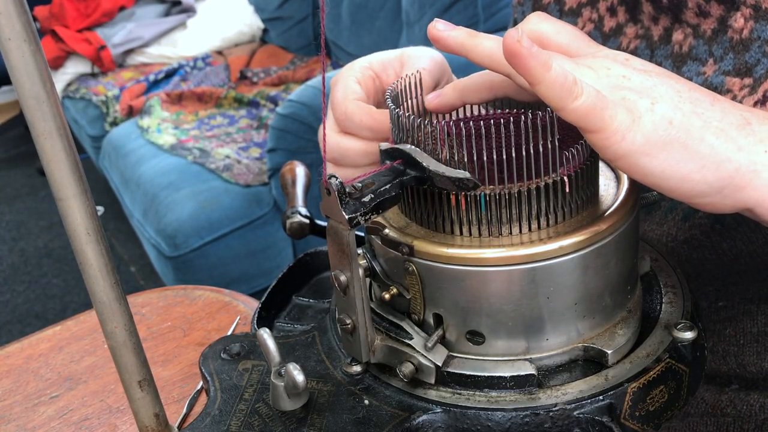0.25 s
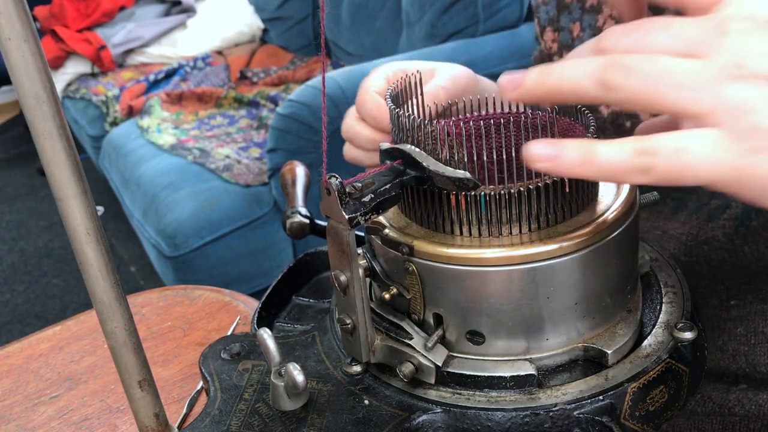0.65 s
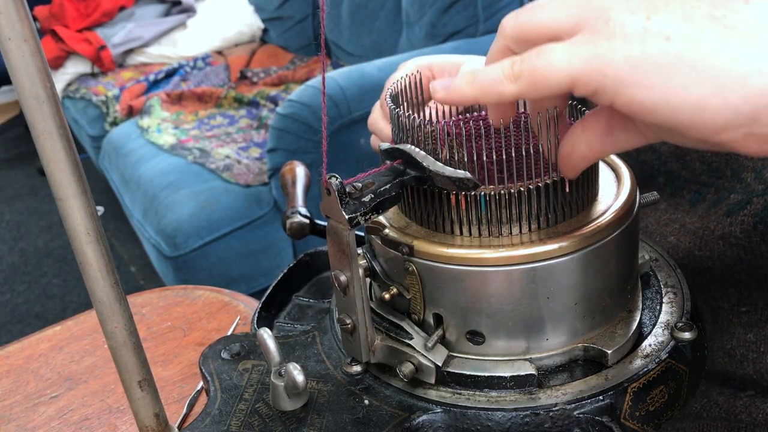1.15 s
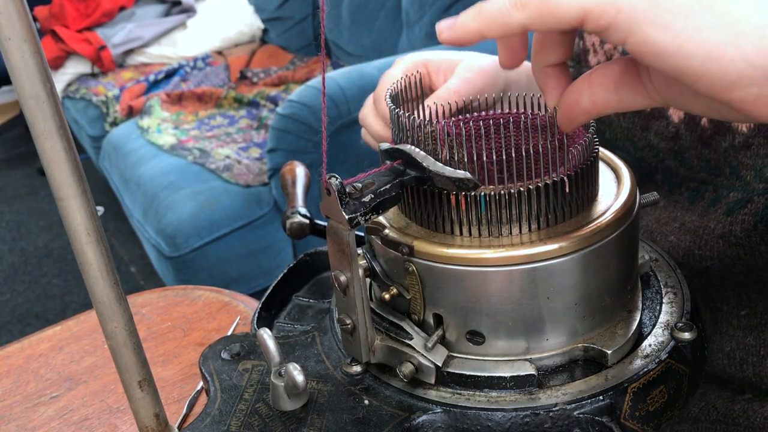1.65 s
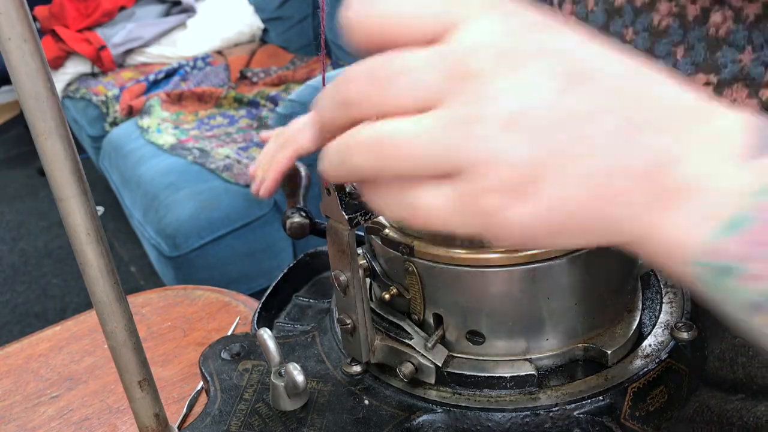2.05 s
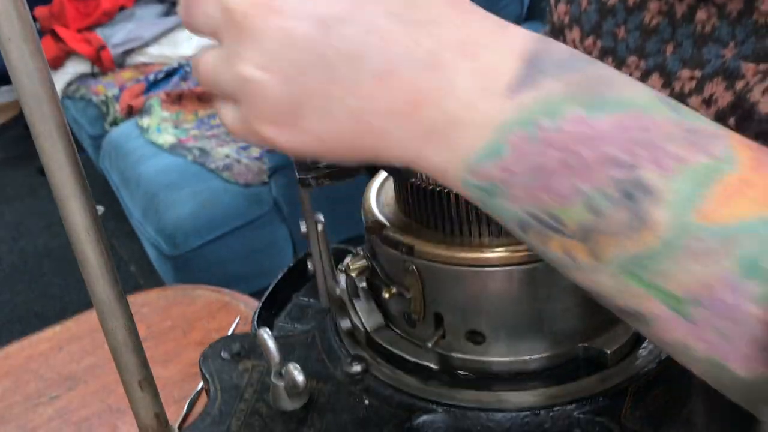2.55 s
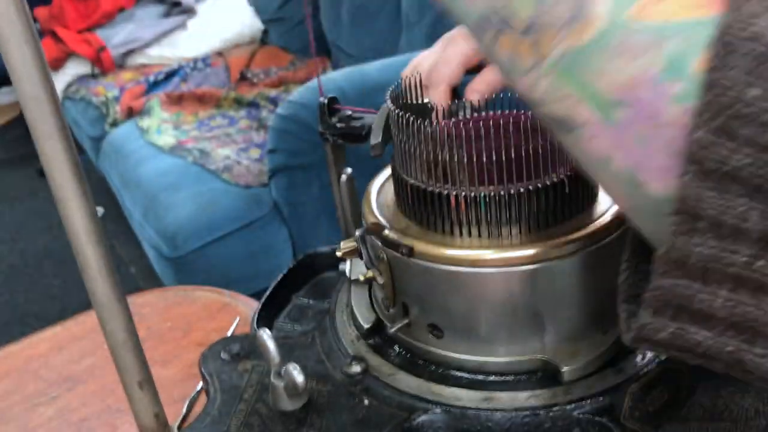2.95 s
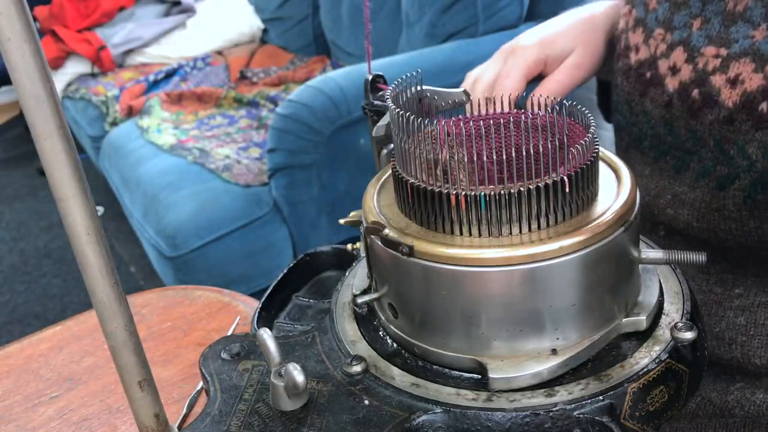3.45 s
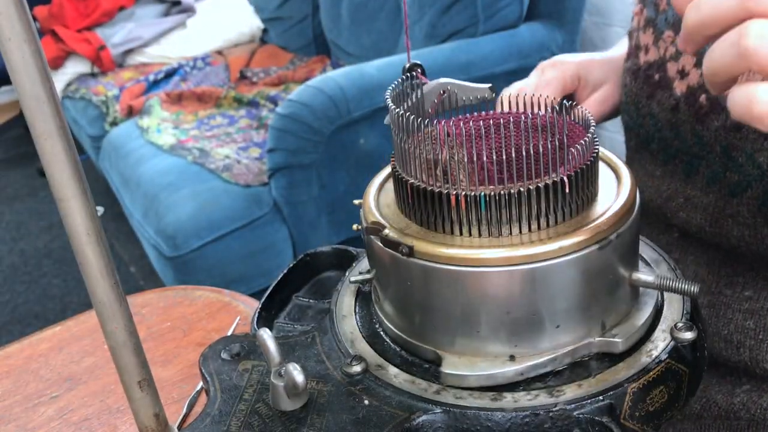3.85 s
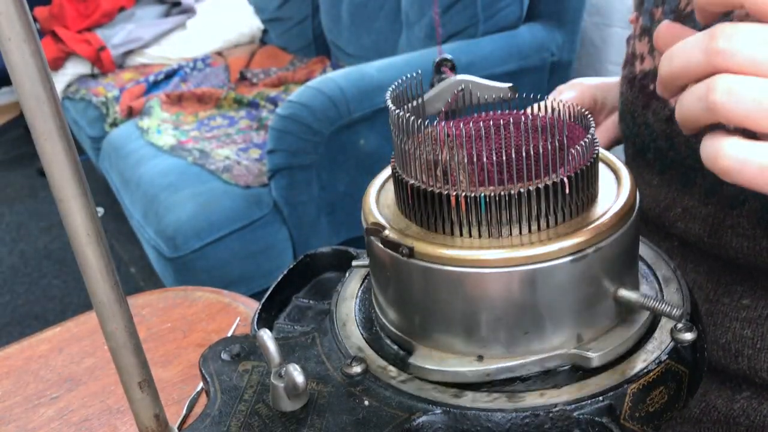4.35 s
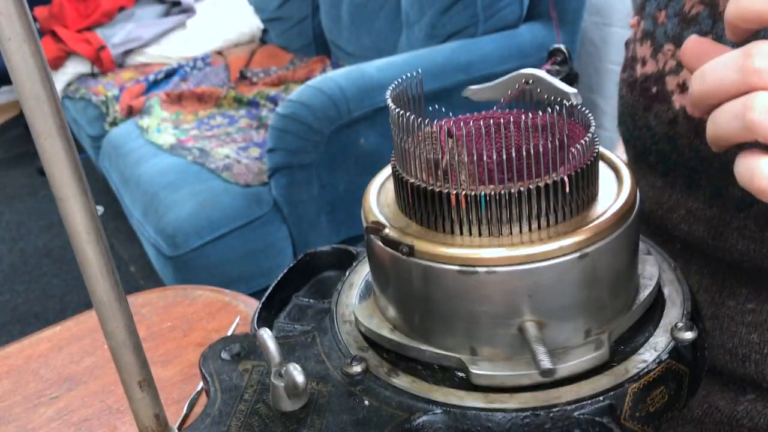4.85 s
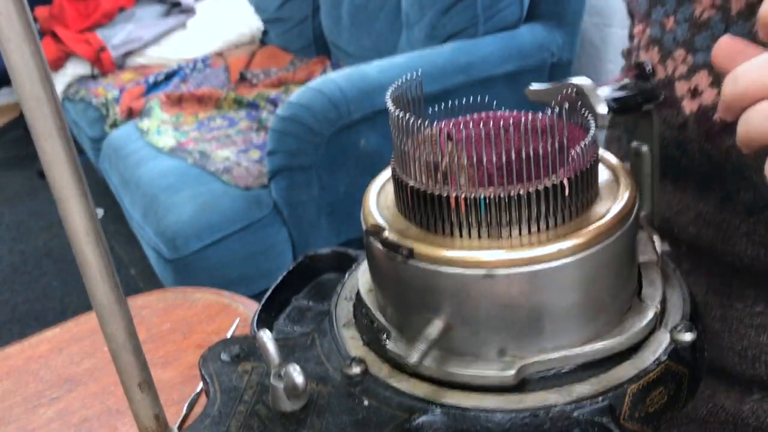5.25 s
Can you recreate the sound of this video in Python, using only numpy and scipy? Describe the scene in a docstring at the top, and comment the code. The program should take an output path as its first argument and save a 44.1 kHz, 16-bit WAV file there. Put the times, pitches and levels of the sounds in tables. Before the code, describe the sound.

A quiet, soft-furnished living room with low room tone and faint hiss, heard close through a small microphone. For the first 1.4 seconds there is almost nothing: a faint stir and tiny needle clicks near 0.8, 0.9 and 1.2. Clearer dry, crackling snaps come at about 1.5, 1.6 and 1.8. At 2.3 a dull carrier bump starts low stand rumble, rubbing and a cluster of muffled iron knocks to 2.7, with a crisp snap at 2.64. At 2.77 comes the loudest event, a hard steel-on-steel clack with a quick bounce, short shell ring and rattling shudder dying within a quarter second. Scattered knocks continue to 3.6, then settle from 3.75 into even gear knocks, roughly eleven per second. From 4.4 bright needle chatter, sliding hiss and irregular snaps rush in, growing gradually as rumble and gear grind rise, still running at the 5.5-second end.

```python
"""Quiet, soft living room: a hand-cranked circular knitting machine on a wooden stand.
Fingers lift single needles (crackling snaps); the carrier clacks against a stop (blows ringing a shell).
The crank turns: gear teeth knock evenly (struck base modes), the stand rumbles (resonant noise) and
needles chatter through the cams (random short rings, sliding hiss). Room tail and hiss surround it."""
import sys
import numpy as np
from scipy import signal
from scipy.fft import rfft, irfft
from scipy.io import wavfile

SR = 44100
rng = np.random.default_rng(int(sys.argv[2]) if len(sys.argv) > 2 else 0)


def file_out(sig):
    """Save sig as 16-bit WAV at sys.argv[1]."""
    # one column per channel
    cols = np.atleast_2d(sig).T
    # limit, then scale
    lim = np.clip(cols, -1, 1)
    pcm = np.round(lim * 32767).astype(np.int16)
    wavfile.write(sys.argv[1], SR, pcm)


N = 242946

# knocks on the iron base: gear teeth, soft nudges, bounces after the hard clack:
# (time [s], strike level [dB], brightness [dB])
BASE_KNOCKS = [(0.083, -65, 5), (0.296, -63.5, 0), (1.396, -66, 0), (1.484, -57, -13), (1.561, -51, -5),
               (1.641, -53, 8), (1.766, -66, 0), (1.807, -54, -3), (1.873, -68, -3), (2.309, -51, -8),
               (2.384, -49, 0), (2.402, -51, 3), (2.475, -47.5, 4), (2.49, -41, -2), (2.51, -42, -1),
               (2.554, -40.5, 0), (2.589, -40.5, 2.5), (2.627, -41, -9), (2.671, -44, 9), (2.843, -43, 1.5),
               (2.881, -42, 0), (2.903, -43, 2), (2.969, -40.5, 6), (3.047, -56, 7), (3.161, -43.5, -3.5),
               (3.243, -54, 4.5), (3.358, -54.5, 2.5), (3.429, -53, 7.5), (3.456, -49.5, -5),
               (3.549, -48.5, 1), (3.742, -42.5, 2), (3.838, -42, 0), (3.916, -40, 6), (4.012, -44, 6),
               (4.103, -38, 6.5), (4.193, -39, 5), (4.285, -41, 5.5), (4.377, -41, 11),
               (4.465, -40.5, 13.5), (4.558, -39, 10), (4.644, -39, -1), (4.697, -53, 0), (4.742, -39.5, 7),
               (4.826, -44.5, -9), (4.911, -40, 2), (5.005, -41, 5), (5.094, -39.5, 5), (5.116, -37, 0),
               (5.179, -37, 6), (5.278, -36, 0), (5.362, -36, 6), (5.386, -45.5, -3), (5.462, -40.5, -6)]
# carrier against the cam shell:
# (time [s], blow level [dB], contact cut-off [Hz], crack level [dB], carrier arm ring level [dB])
CARRIER_BLOWS = [(2.3170, -31, 947, -56.5, -68.5), (2.3215, -33, 1099, -65, -71),
                 (2.7162, -32, 780, -67, -79.5), (2.7202, -36.5, 780, -71, -82.5),
                 (2.7730, -24.5, 3000, -14.5, -47.5), (2.7752, -15, 2600, -28.5, -70.5),
                 (2.7890, -26, 1199, -38, -66.5)]
# needle traffic spectrum: (frequency [Hz], level per Hz [dB])
TRAFFIC_SPECTRUM = [(880, -28.5), (1500, -0.5), (3150, -9.5), (4060, -7.5), (6250, -7.5), (7670, -10.5),
                    (9140, -10.5), (10400, -9), (11800, -11), (15500, -18)]
IDLE_DB, ENGAGE_S, ENGAGE_RISE_S = -83, 4.38, 0.14   # idle needles; cams reach them, rise time


def amp(db):
    """Decibels to gain."""
    return 10 ** (np.asarray(db) / 20)


def rms_one(x):
    """Scale to unit rms."""
    return x / np.sqrt(np.mean(x ** 2) + 1e-20)


def at_hz(points, hz):
    """Read a table on a log-frequency axis."""
    table_hz, values = np.array(points).T
    return np.interp(np.log(hz), np.log(table_hz), values)


def coloured(x, spectrum):
    """Weight a signal by a spectrum table; rms 1."""
    hz = np.maximum(np.fft.rfftfreq(N, 1 / SR), 1)
    return rms_one(irfft(rfft(x) * amp(at_hz(spectrum, hz)), N))


def ring(force, hz, t60_s):
    """Two-pole mode: a unit click starts a decaying sine of height 1."""
    r, w = amp(-60 / (t60_s * SR)), 2 * np.pi * hz / SR
    return signal.lfilter([0, np.sin(w)], [1, -2 * r * np.cos(w), r * r], force + 1e-18)


def resonant_noise(peaks):
    """Steady random shaking through resonances (Hz, width Hz, dB); rms 1."""
    total = np.zeros(N)
    for hz, width_hz, db in peaks:
        total += amp(db) * rms_one(ring(rng.standard_normal(N), hz, 2.0 / width_hz))
    return rms_one(total)


def band(x, low_hz, high_hz):
    """Band-pass."""
    return signal.sosfilt(signal.butter(2, [low_hz, high_hz], "band", fs=SR, output="sos"), x)


def add(track, s, sound):
    """Mix a short sound in at a time."""
    at = round(s * SR)
    track[at:at + len(sound)] += sound[:len(track) - at]


def drift(rate_hz):
    """Slow random wander of spread 1: twice low-passed noise."""
    r = np.exp(-2 * np.pi * rate_hz / SR)
    wander = signal.lfilter([1], [1, -2 * r, r * r], rng.standard_normal(N + 4000))
    return rms_one(wander[4000:])   # settled part


def hush():
    """Room and microphone hiss: steady coloured noise."""
    # (frequency [Hz], level per Hz [dB])
    hush_spectrum = [(18, -32), (30, -1.5), (55, 0), (86, -10), (131, -3), (233, -13), (266, -20.5),
                     (384, -12), (449, -20.5), (632, -20), (866, -25), (988, -23), (1760, -29), (2750, -30),
                     (16000, -36.5)]
    return amp(-70) * coloured(rng.standard_normal(N), hush_spectrum)


def work():
    """Hands and crank: shaking of the stand and load on the gears, in dB over time."""
    # (time [s], shaking of the stand [dB], load on the gears [dB])
    effort = [(0.0, -79, -86), (0.36, -66.5, -90), (0.7, -85.5, -88), (1.3, -88, -82.5), (1.51, -61, -78),
              (1.64, -64, -81), (1.88, -75, -86), (2.12, -82.5, -93), (2.27, -63.5, -93),
              (2.36, -50.5, -57.5), (2.49, -60, -75), (2.56, -60.5, -63), (2.76, -65, -56.5),
              (2.97, -57, -71), (3.2, -70.5, -78.5), (3.72, -63, -76), (4.31, -66.5, -88),
              (4.52, -60, -64.5), (5.0, -58.5, -67), (5.3, -53.5, -63), (5.51, -52, -63)]
    s, shaking_db, load_db = np.transpose(effort)
    t = np.arange(N) / SR
    return np.interp(t, s, shaking_db), np.interp(t, s, load_db)


def stand_sway(shaking_db):
    """Low stand resonances under the shaking."""
    # (frequency [Hz], width [Hz], level [dB])
    sway_peaks = [(46, 5.8, 3.5), (110, 28, 4)]
    return amp(shaking_db) * resonant_noise(sway_peaks)


def machine_hum(shaking_db, load_db, traffic_db):
    """Lumpy mid-low resonances that follow part of the shaking, load and needle swings."""
    # (frequency [Hz], width [Hz], level [dB])
    hum_peaks = [(227, 23, -6.5), (300.9, 16, -1), (334, 33, 1)]
    base_db, lump_db, lump_hz = -68.5, 2.5, 9.0
    with_shaking, with_load, with_needles = 0.3, 0.27, 0.23   # shares of the dB swings
    hum_db = base_db + with_shaking * (shaking_db + 64.5) + with_load * (load_db + 65.5)
    hum_db = hum_db + with_needles * (traffic_db - IDLE_DB)
    return amp(hum_db + lump_db * drift(lump_hz)) * resonant_noise(hum_peaks)


def gear_grind(load_db):
    """Resonant rubbing of the gears under load."""
    # (frequency [Hz], width [Hz], level [dB])
    grind_peaks = [(610, 180, 2.5), (713, 120, 1), (900, 120, -14.5), (1294, 52, -3.5), (1591, 290, -7)]
    return amp(load_db) * resonant_noise(grind_peaks)


def needle_traffic(load_db):
    """Level in dB: idle stirring with the load, a first rush as the cams engage, slow growth."""
    idle_with_load = 0.2   # share of the load's swing
    running_start_db, growth_db_per_s, rush_db, rush_fade_s = -69.5, 6, 6, 0.072
    t = np.arange(N) / SR - ENGAGE_S
    engaged = np.clip(t / ENGAGE_RISE_S, 0, 1)
    since = np.maximum(t - ENGAGE_RISE_S, 0)
    running_db = running_start_db + rush_db * np.exp(-since / rush_fade_s) + growth_db_per_s * since
    idle_db = IDLE_DB + idle_with_load * (load_db + 80.5)
    return idle_db + engaged * (running_db - idle_db)


def chatter():
    """Many latch and butt contacts of uneven size, each ringing briefly at one of 16 pitches; rms 1."""
    contacts_per_s, spread_db, longest_t60_s = 520, 4, 0.019
    sizes = amp(spread_db * np.minimum(rng.exponential(1, N), 4)) * rng.choice([-1, 1], N)
    born = rng.random(N) < contacts_per_s / SR
    pitches_hz, dealt = np.geomspace(1600, 15500, 16), rng.integers(0, 16, N)
    total = np.zeros(N)
    for k, hz in enumerate(pitches_hz):
        gain = amp(at_hz(TRAFFIC_SPECTRUM, hz)) * np.sqrt(hz)   # sqrt: pitches lie wider apart higher up
        total += gain * ring(sizes * born * (dealt == k), hz, min(84.0 / hz, longest_t60_s))
    return rms_one(total)


def moving_needles(traffic_db):
    """Sliding hiss; contacts join as traffic grows, the whole level wandering randomly in quick lumps."""
    chatter_start_db, slide_db, lump_db, lump_hz = -71.5, -2, 3, 23
    busy = amp(traffic_db)
    contact_share = busy ** 2 / (busy ** 2 + amp(chatter_start_db) ** 2)   # half at the start level
    contacts = contact_share * chatter()
    sliding = amp(slide_db) * coloured(rng.standard_normal(N), TRAFFIC_SPECTRUM)
    return busy * amp(lump_db * drift(lump_hz)) * (contacts + sliding)


def knock_swells():
    """Faint noise near 1 kHz swells for a few milliseconds before each knock."""
    swell_db, growth_s = -20.5, 0.0036
    swell, t = np.zeros(N), np.arange(-600, 0) / SR
    for s, strike_db, _ in BASE_KNOCKS:
        add(swell, s - 600 / SR, amp(strike_db + swell_db) * np.exp(t / growth_s))
    return swell * rms_one(band(rng.standard_normal(N), 900, 1300))


def knocks():
    """Each rounded contact strikes every base mode, a little differently each time."""
    # iron base modes: (frequency [Hz], level [dB], T60 [s])
    base_modes = [(230, -13.5, 0.047), (327.2, -11.5, 0.12), (600.7, -3, 0.057), (733, -0.5, 0.029),
                  (880, 2.5, 0.032), (1113, 0.5, 0.036), (1480, -30.5, 0.018), (2470, -23, .012),
                  (3990, -26.5, 0.0041)]
    contact_s, bright_above_hz, vary_spread_db = 0.0012, 1300, 2.5
    s, strike_db, bright_db = np.transpose(BASE_KNOCKS)
    at = np.round(s * SR).astype(int)
    deep, bright = np.zeros(N), np.zeros(N)
    vary_db = vary_spread_db * rng.standard_normal((len(s), len(base_modes)))
    for k, (hz, mode_db, t60_s) in enumerate(base_modes):
        is_bright = hz > bright_above_hz
        force = np.zeros(N)
        force[at] = amp(strike_db + mode_db + vary_db[:, k] + bright_db * is_bright) * (-1) ** k
        add(bright if is_bright else deep, 0, ring(force, hz, t60_s))
    contact = np.hanning(round(contact_s * SR))
    rounded = signal.lfilter(contact / contact.sum(), [1], deep)
    return rounded + np.roll(bright, len(contact) // 2)   # bright tick comes as the contact peaks


def needles():
    """Needles snap in their slots: milliseconds of dying crackle in low, middle and top parts."""
    # snaps up or down: (time [s], middle part peak [dB], low part [dB re middle], top part [dB re middle])
    single_snaps = [(0.7683, -61, -5, -16), (0.8959, -51.5, -9, -5), (1.1658, -52.5, -28, -8),
                    (1.484, -42, -50, -15), (1.5544, -61, -8, -11), (1.5966, -58, -8, -1),
                    (1.6326, -35, -29, -2), (1.8065, -39, -8.5, 1), (1.8225, -65, -20, 1),
                    (2.527, -57, 3.5, -3), (2.6392, -30, -7.5, -7.5), (2.7244, -44, -19, -13.5),
                    (2.7492, -58, -9.5, -30.5), (3.109, -59.5, -11, -21), (3.5319, -56.5, -16.5, -20.5),
                    (3.6646, -49.5, -12.5, -30), (3.7648, -39, -37, -10.5), (3.8886, -50, -22.5, -11),
                    (3.9115, -53.5, 2, -19.5), (4.042, -43.5, -8, -12.5), (4.3491, -42.5, -11.5, -19),
                    (4.3755, -47.5, 2, -20), (4.4538, -43.5, -16, -14), (4.4624, -43, 0, -39),
                    (4.472, -37, -40, -3.5), (4.558, -39.5, -4, -1), (4.5988, -47, -20, -25),
                    (4.6125, -42.5, -12, -22), (4.6533, -44, -6, -9), (4.6691, -44.5, -10, -3),
                    (4.7376, -48, -9, -24), (4.784, -55, -2, -11), (4.8558, -50, -11, -13),
                    (4.8778, -43.5, -1.5, -5), (4.9042, -51, -6, 6), (4.945, -46, -3, -9),
                    (4.9694, -46, -5, -12), (4.9945, -44, -8, -7), (5.0375, -42.5, -6, -3.5),
                    (5.1254, -44.5, -3, -4), (5.161, -47, -4, -2), (5.1893, -39.5, -7, -11),
                    (5.243, -39.5, -5.5, -5), (5.256, -47, -16, -11), (5.2951, -39.5, -5, -9),
                    (5.322, -46, -9, -19), (5.3608, -42.5, -5, -11), (5.437, -48, -6, -20)]
    rise_s, decay_s = 0.00099, 0.0022
    rows, t = single_snaps + light_snaps(), np.arange(1200) / SR
    envelope = np.exp(-t / decay_s) * np.minimum(t / rise_s, 1)
    noise = rng.standard_normal((len(rows), 1200)) * envelope
    parts = [band(noise, 900, 2560), band(band(noise, 1900, 8200), 1900, 8200), band(noise, 6800, 14000)]
    low, middle, top = [p / np.abs(p).max(axis=1, keepdims=True) for p in parts]
    out = np.zeros(N + SR)
    for k, (s, peak_db, low_db, top_db) in enumerate(rows):
        add(out, s, amp(peak_db) * (amp(low_db) * low[k] + middle[k] + amp(top_db) * top[k]))
    return out[:N]


def clacks():
    """Blows and bounces, each with its own contact cut-off, drive the shell; each starts a crack."""
    # cam shell modes: (frequency [Hz], level [dB], T60 [s])
    shell_modes = [(109.5, -21.5, 0.1), (226, -12, 0.053), (356, -12, 0.078), (505, -7.5, 0.022),
                   (650, -2.5, 0.033), (752, -4, 0.071), (855, -13.5, 0.045), (1050, -9, 0.035),
                   (1314, -0.5, 0.027), (1540, -7, 0.056), (1600, -5.5, .04), (1780, -7, 0.019),
                   (1805, -10, 0.066), (2169, -13, 0.019), (2550, -15, 0.039)]
    # steel on steel: (frequency [Hz], level per Hz [dB])
    crack_spectrum = [(1180, -26.5), (2000, 2), (2240, -8.5), (2930, 1.5), (3520, -10.5), (4260, -0.5),
                      (5300, -13.5), (5830, -6.5), (6420, -23), (7980, -19), (10500, -33), (13000, -34),
                      (16000, -42)]
    crack_s = 0.00086   # time to peak, then decay constant
    force, cracks, t = np.zeros(N), np.zeros(N), np.arange(2000) / SR
    for s, blow_db, contact_hz, crack_db, _ in CARRIER_BLOWS:
        b, a = signal.butter(2, contact_hz, fs=SR)
        add(force, s, amp(blow_db) * signal.lfilter(b, a, t == 0))
        add(cracks, s, amp(crack_db) * t / crack_s * np.exp(1 - t / crack_s))
    shell = np.zeros(N)
    for k, (hz, db, t60_s) in enumerate(shell_modes):
        shell += amp(db) * (-1) ** k * ring(force, hz, t60_s)
    return shell + cracks * coloured(rng.standard_normal(N), crack_spectrum)


def arm():
    """The thin carrier arm rings on after each blow."""
    # (frequency [Hz], level [dB], T60 [s])
    arm_modes = [(2670, -2, 0.37), (4633, -1.5, 0.094)]
    plucks = np.zeros(N)
    for s, _, _, _, arm_db in CARRIER_BLOWS:
        add(plucks, s, amp([arm_db]))
    return sum(amp(db) * ring(plucks, hz, t60_s) for hz, db, t60_s in arm_modes)


def shudder():
    """Dense dying rattle of stand, base and loose needles after the hard clack."""
    # (frequency [Hz], level per Hz [dB])
    shudder_spectrum = [(35, -30), (60, 1), (172, -9), (342, -5.5), (653, -6.5), (757, -2.5), (1120, -9),
                        (1270, -2.5), (2020, -22.5), (5000, -31), (6500, -55.5), (11000, -120)]
    start_s, start_db, rise_s, t60_s = 2.78, -28, 0.002, 0.25
    t = np.maximum(np.arange(N) / SR - start_s, 0)
    envelope = (1 - np.exp(-t / rise_s)) * amp(start_db - 60 * t / t60_s)
    return envelope * coloured(rng.standard_normal(N), shudder_spectrum)


def light_snaps():
    """Lighter needle snaps at random once the cams run: rows (s, dB, low dB, top dB)."""
    per_s, middle_db, spread_db, low_db, top_db = 14, -49, 5.5, -7, -17
    span_s = N / SR - ENGAGE_S
    rows = []
    for a, b, c, d in rng.random((round(per_s * span_s), 4)):
        s = ENGAGE_S + ENGAGE_RISE_S / 2 + a * span_s
        peak_db = middle_db + spread_db * (2 * b - 1)
        rows.append((s, peak_db, low_db + 10 * (c - 0.5), top_db + 10 * (d - 0.5)))
    return rows


def room(x):
    """Diffuse tail: octave bands of noise, each dying at its own rate, swelling over a short gap."""
    # (frequency [Hz], T60 [s])
    room_decay = [(100, 0.76), (400, 0.36), (1000, 0.33), (3000, 0.24), (8000, 0.093), (15000, 0.21)]
    gap_s = 0.0017
    t = np.arange(SR // 2) / SR
    tail = np.zeros(len(t))
    for low_hz in 60 * 2.0 ** np.arange(8):
        t60_s = at_hz(room_decay, np.sqrt(2) * low_hz)
        tail += band(rng.standard_normal(len(t)), low_hz, 2 * low_hz) * amp(-60 * t / t60_s)
    tail *= np.clip(t / gap_s, 0, 1) ** 2
    return signal.fftconvolve(x, tail / np.sqrt(np.sum(tail ** 2)))[:N]


def scene():
    """The machine, its room tail and the hush."""
    room_db, knock_room_db = -11.5, -26.5   # knocks travel mostly through the stand and stay dry
    shaking_db, load_db = work()
    traffic_db = needle_traffic(load_db)
    running = stand_sway(shaking_db) + machine_hum(shaking_db, load_db, traffic_db) + gear_grind(load_db)
    base = knocks() + knock_swells()
    hits = clacks() + needles() + moving_needles(traffic_db)
    wet = room(amp(room_db) * hits + amp(knock_room_db) * base)
    return (hits + base + arm() + shudder() + wet + running + hush())[None]


def record(dry):
    """A small microphone: two notches from its housing, no deep bass, the top cut steeply."""
    # housing notches: (frequency [Hz], width [Hz], level [dB])
    mic_notches = [(7720, 600, -4), (10430, 710, -4.5)]
    low_cut_hz, high_cut_hz = 36.3, 16500
    hz = np.fft.rfftfreq(N, 1 / SR)
    notch_db = sum(db * np.exp(-((hz - at) / width_hz) ** 2) for at, width_hz, db in mic_notches)
    notched = irfft(rfft(dry) * amp(notch_db), N)
    no_bass = signal.sosfilt(signal.butter(6, low_cut_hz, "high", fs=SR, output="sos"), notched)
    return signal.sosfilt(signal.cheby2(14, 60, high_cut_hz, fs=SR, output="sos"), no_bass)


dry = scene()
out = record(dry)
file_out(out)
```